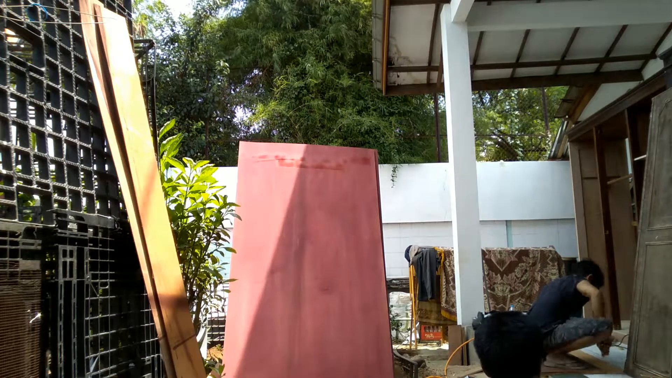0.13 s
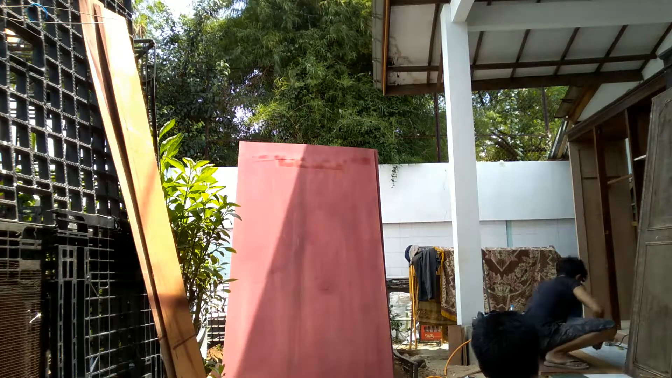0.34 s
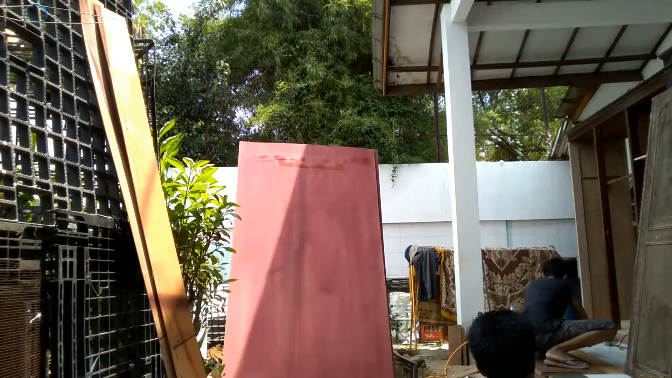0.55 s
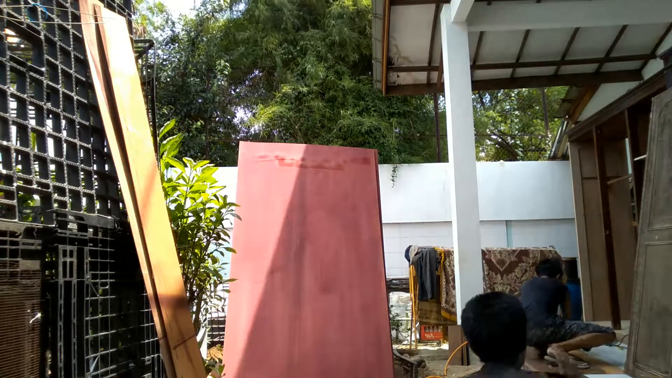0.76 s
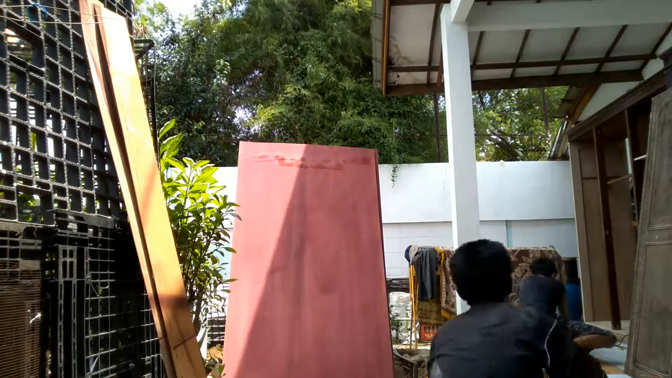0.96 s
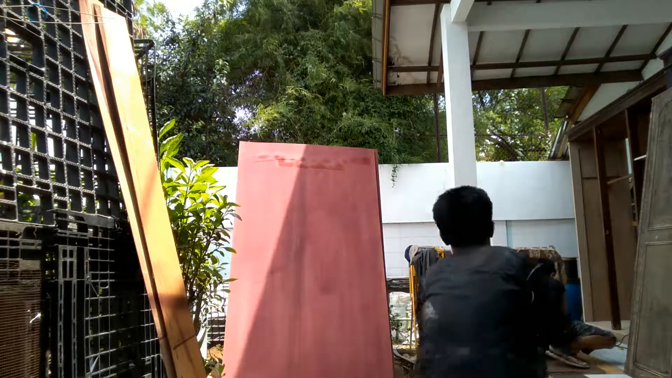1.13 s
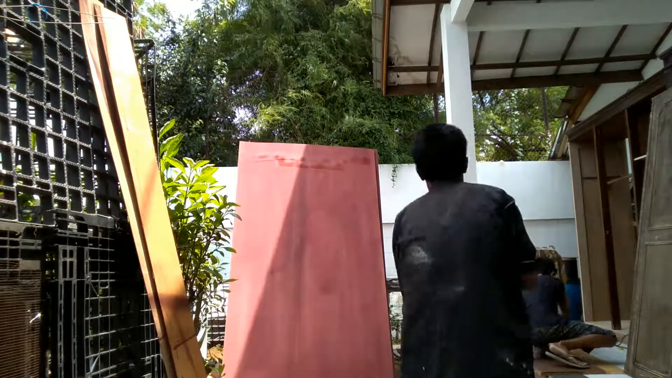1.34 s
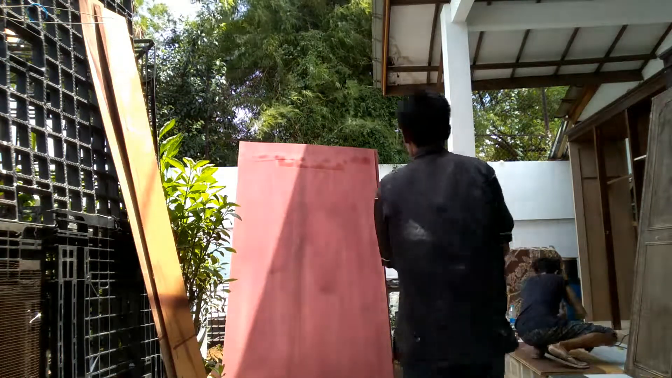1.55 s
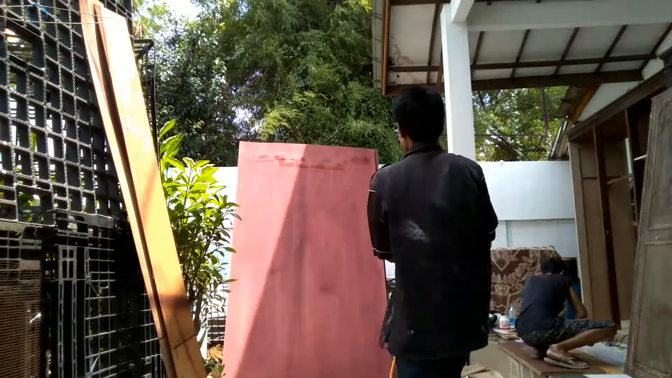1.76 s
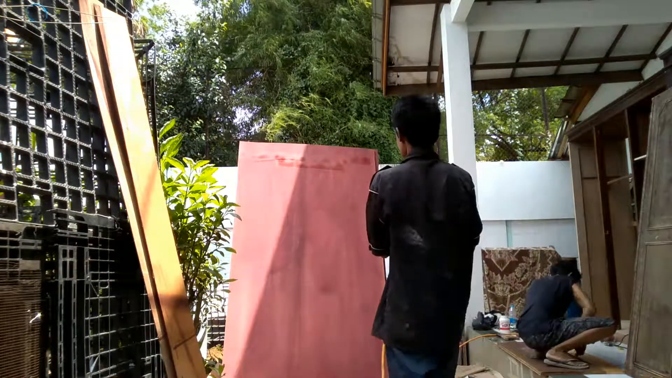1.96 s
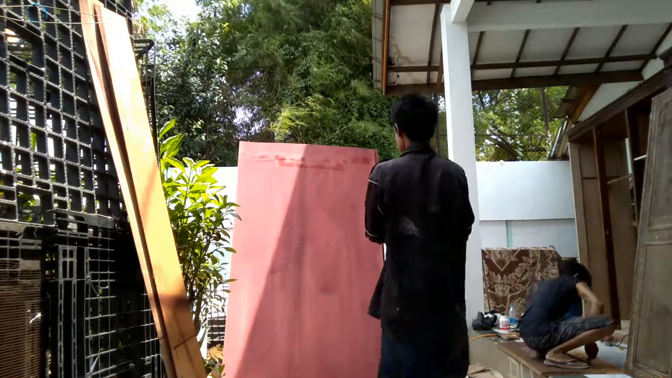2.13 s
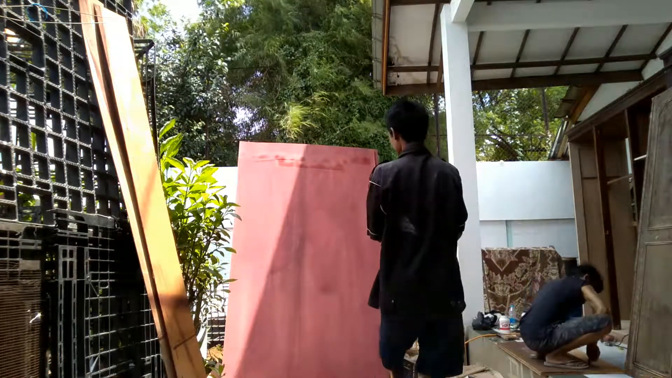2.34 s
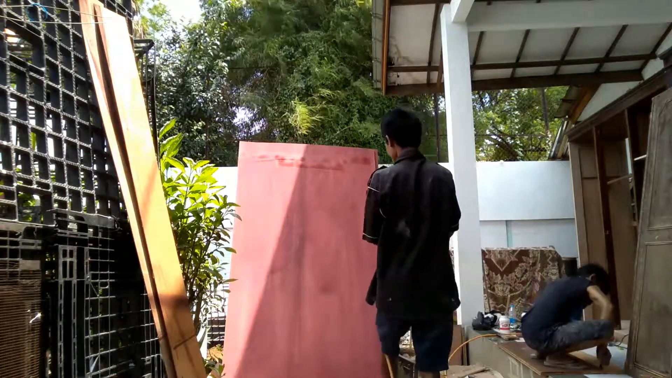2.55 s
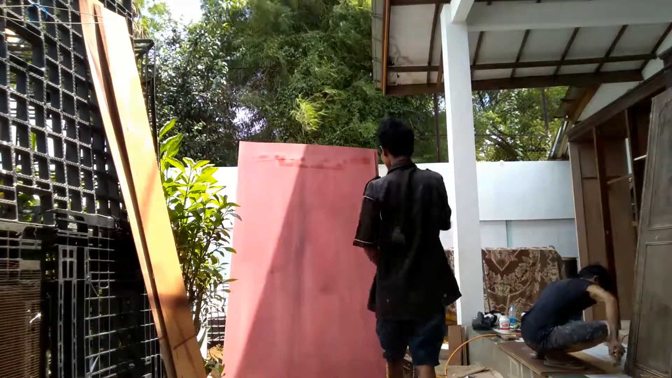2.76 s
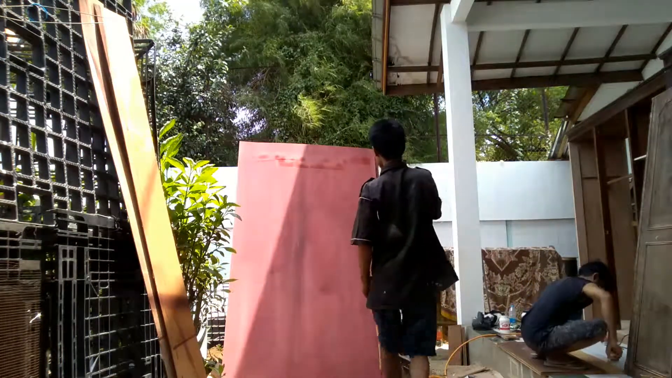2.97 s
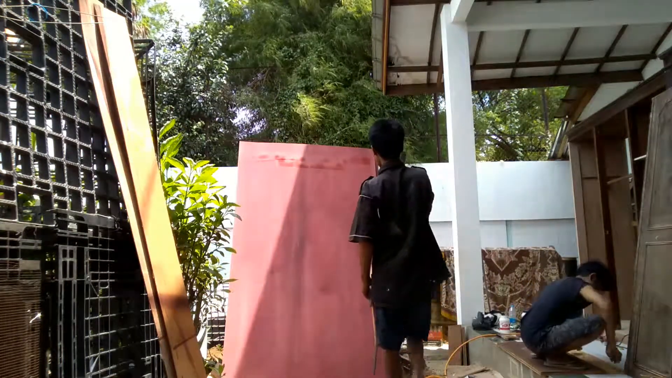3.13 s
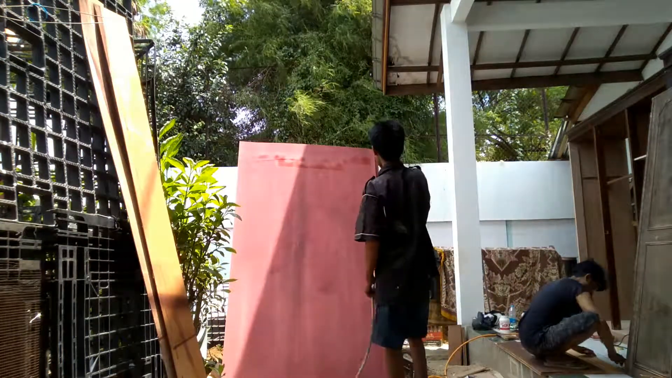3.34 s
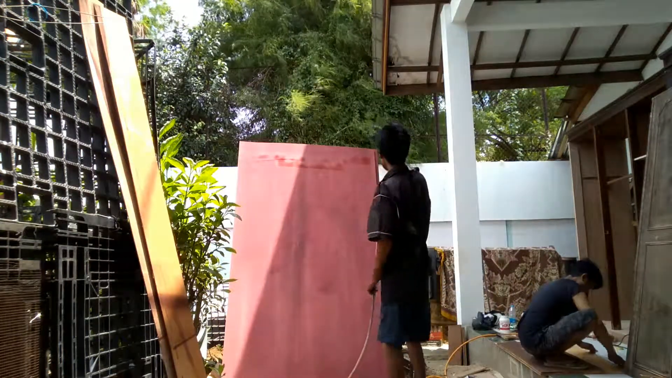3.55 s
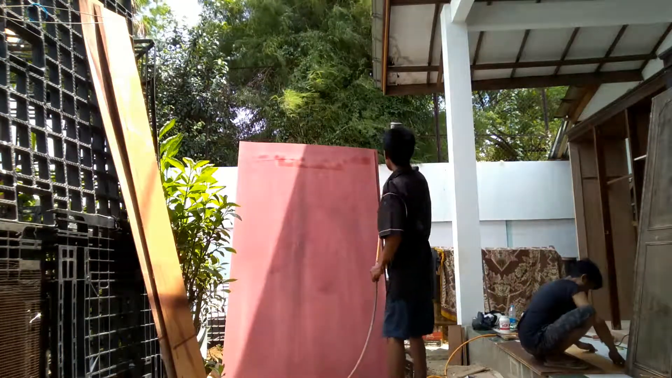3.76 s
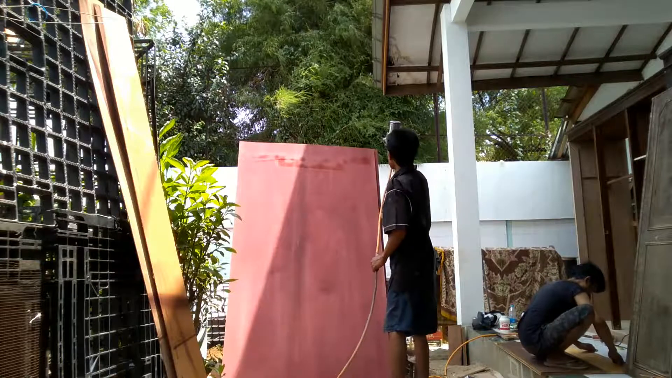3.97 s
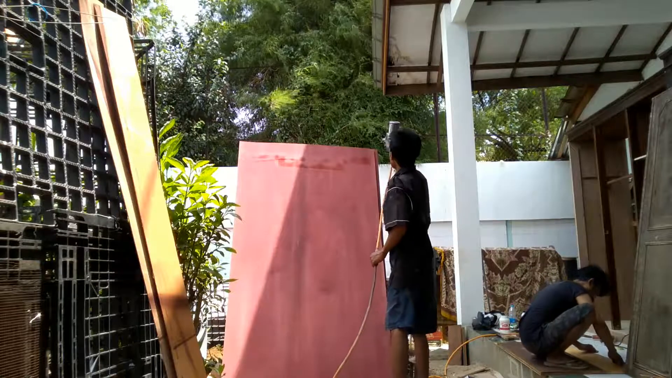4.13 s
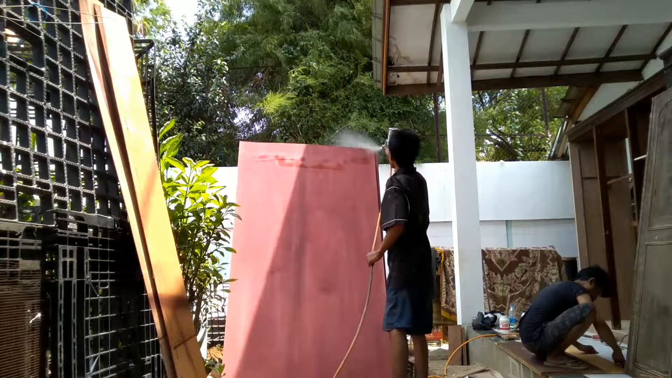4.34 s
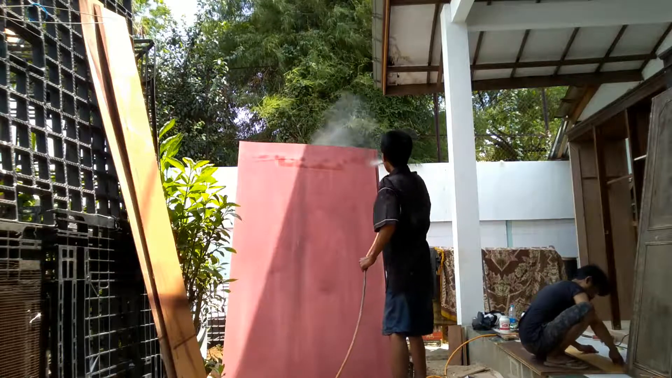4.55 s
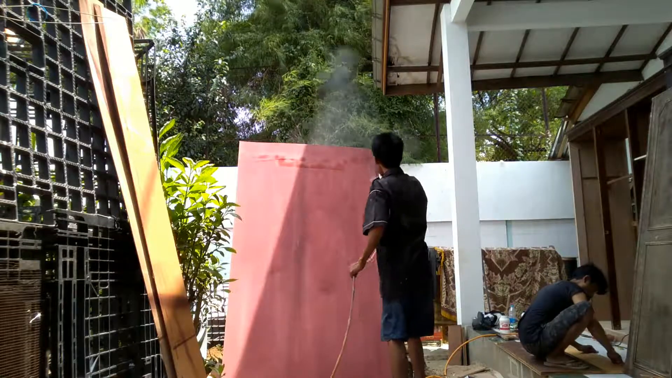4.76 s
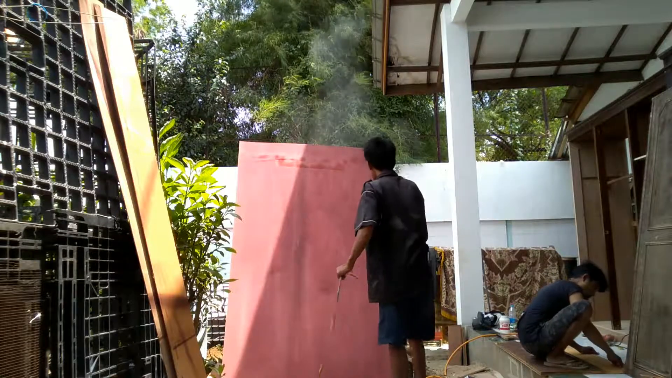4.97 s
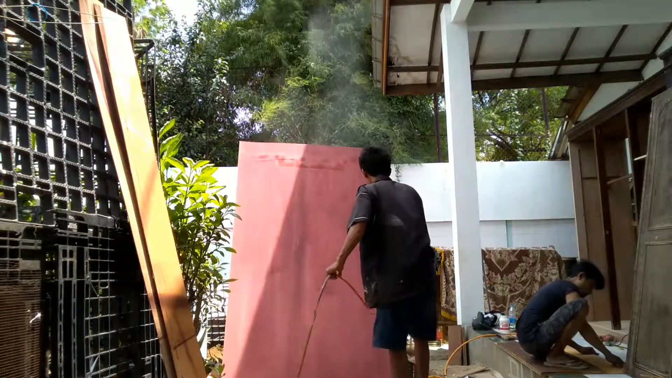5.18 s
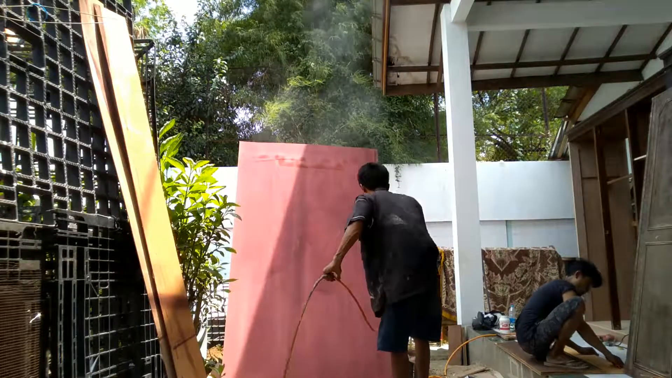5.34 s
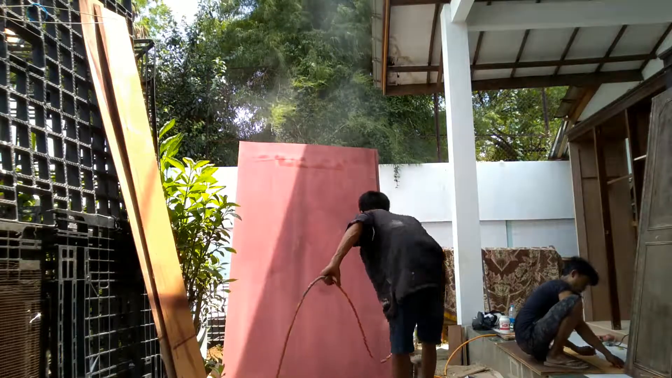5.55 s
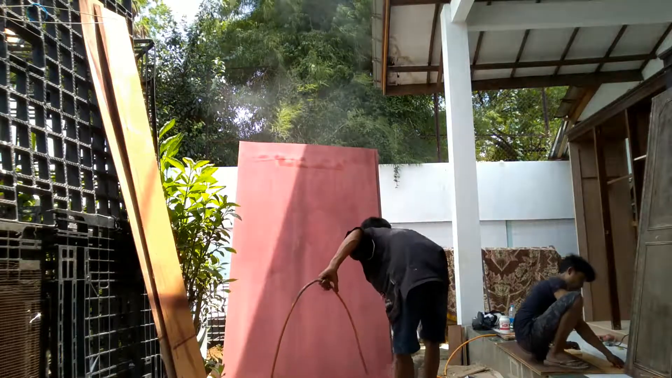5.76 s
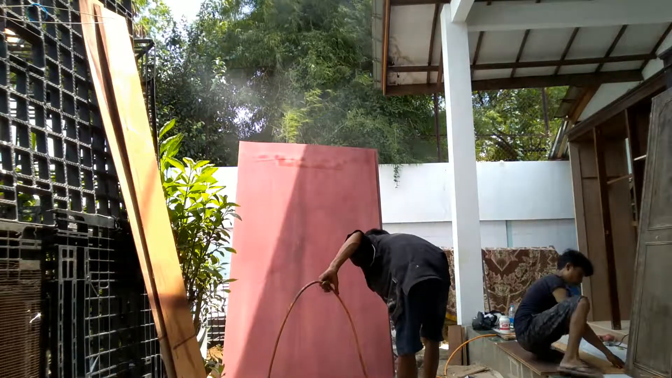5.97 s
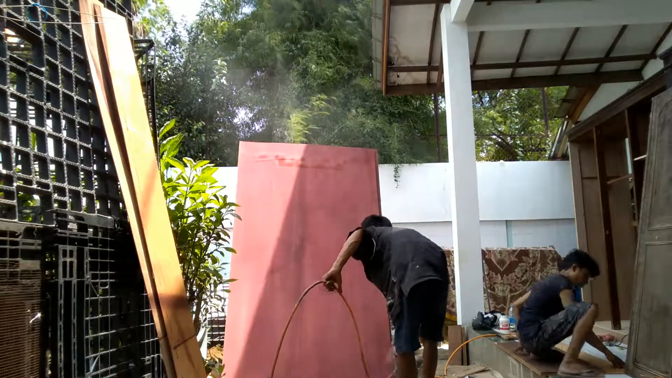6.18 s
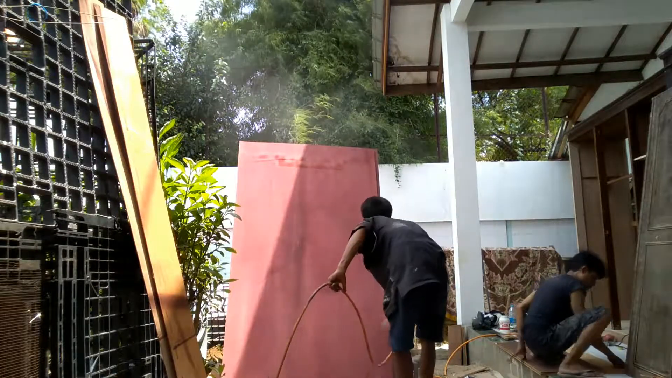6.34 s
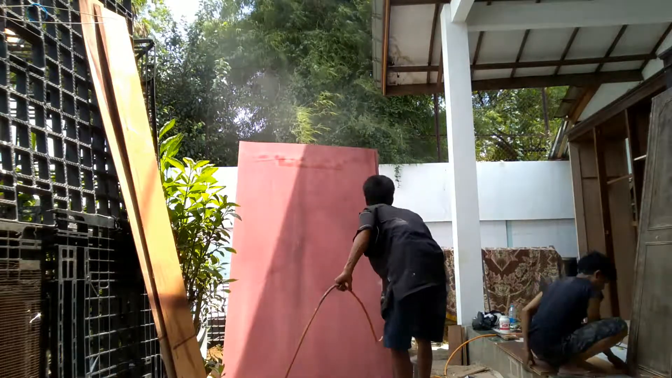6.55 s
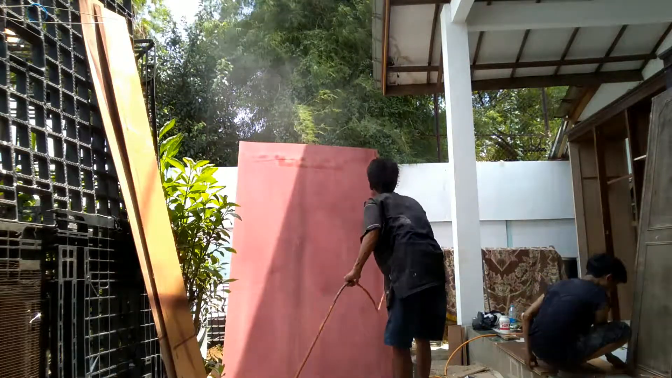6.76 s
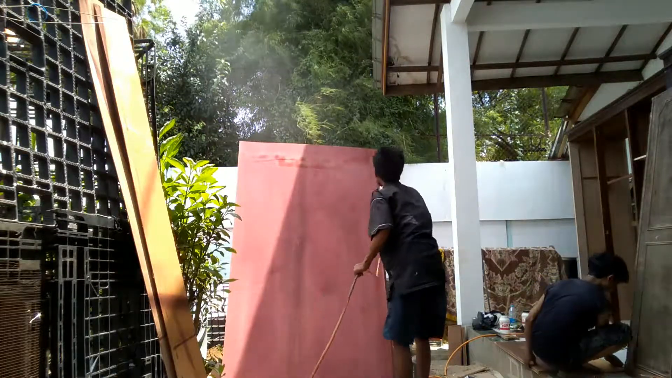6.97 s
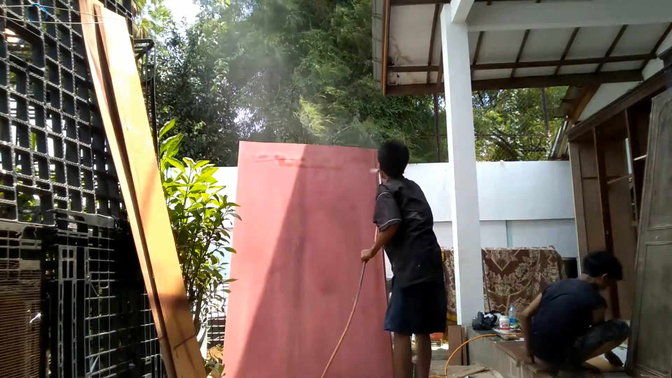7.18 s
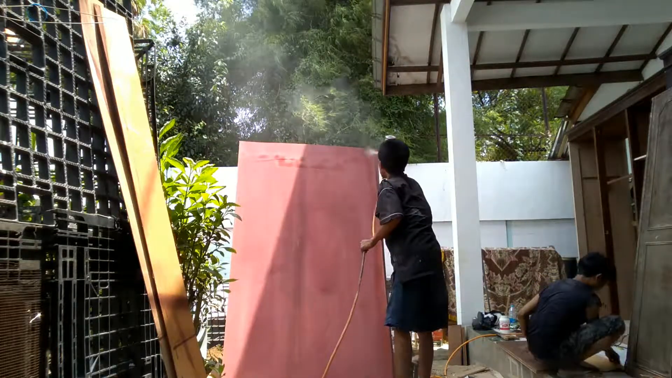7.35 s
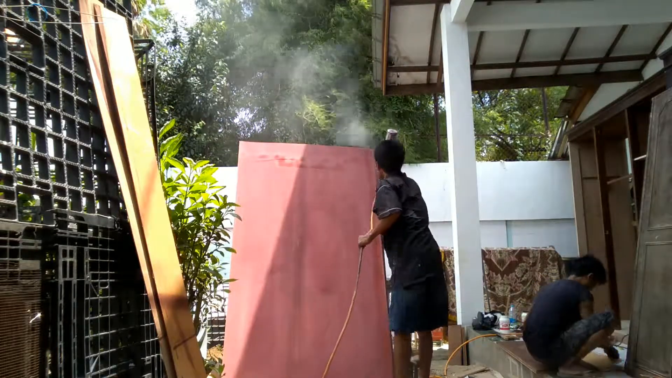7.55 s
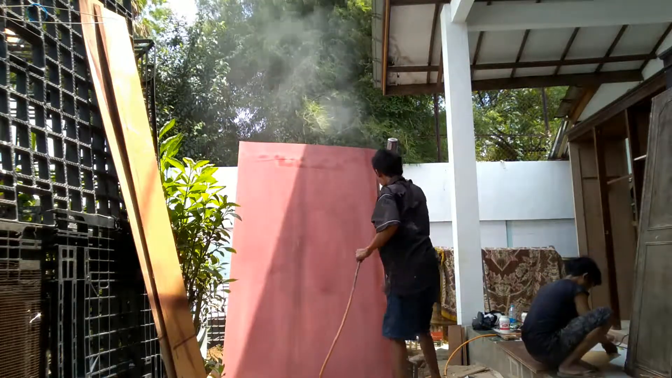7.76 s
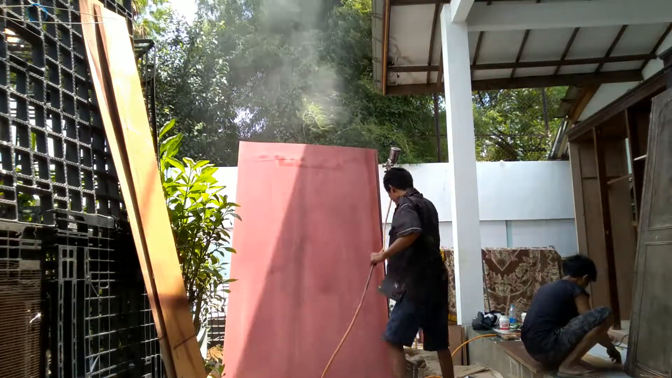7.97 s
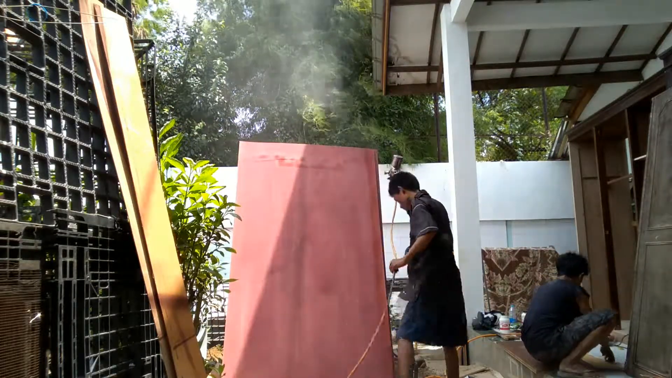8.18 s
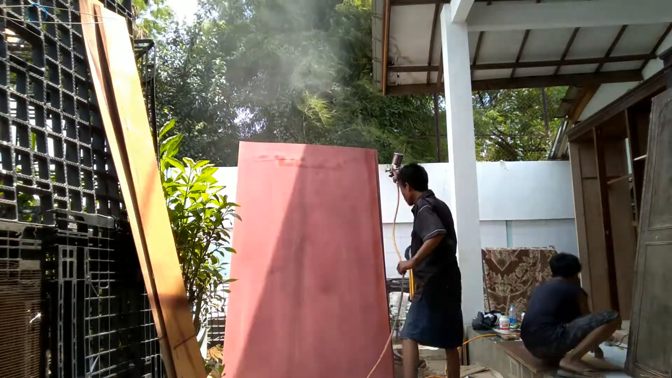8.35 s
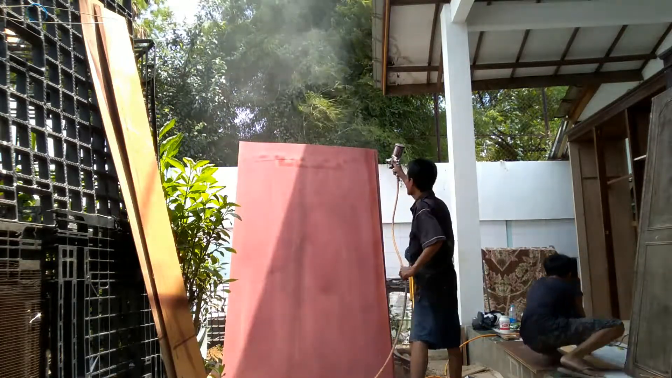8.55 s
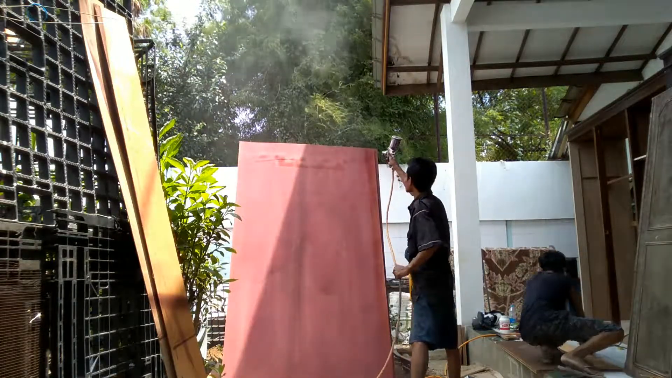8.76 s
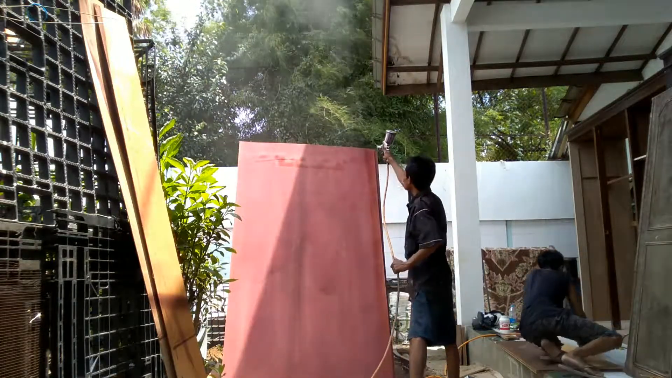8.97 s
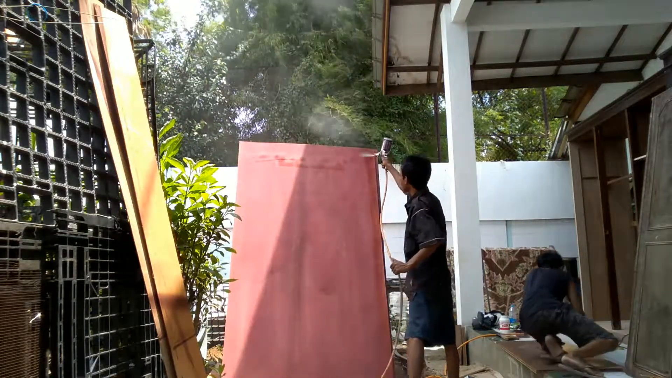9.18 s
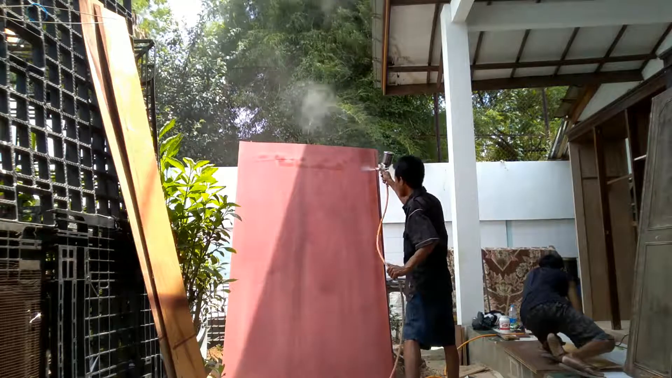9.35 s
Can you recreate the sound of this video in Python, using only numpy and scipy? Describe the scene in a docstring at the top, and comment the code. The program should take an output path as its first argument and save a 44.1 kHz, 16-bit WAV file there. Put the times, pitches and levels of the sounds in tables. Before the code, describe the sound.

An air compressor runs throughout behind a porch in an open yard: a steady low-mid hum with a fast piston clatter of about 24 turns a second, over soft machine rush, faint leak hiss and a light breeze. At 0.7 and 0.9 s two hard blows strike boards and a can, with short scattered outdoor echoes; after the second the can rocks, ringing in quick fading swells until 1.1 s. Bright, abrupt spray-gun puffs come at 2.0 and 2.55 s, then a shorter one at 3.9 s with a trigger click and light knock. From 4.2 s a soft board scuff opens a long, faint spray pass with a very high, thin whistle until 6.2 s; the hiss continues to 7.7 s. Light knocks fall at 6.1 and, hollower, 7.6 s. Low gusts buffet the microphone from about 7.8 s, with a faint scuff near 8.7 s, tiny puffs, and another whistling pass from 9.0 s to the end.

```python
"""A two-port microphone in an open yard: an air compressor behind a porch sums steady multiples of its turn,
under coloured noise for its rush, its leaks and a buffeting breeze. Blows ring boards and a can at 0.7 and 0.9
s, scatter a short tail off porch and walls, and the can's ring comes and goes in swells. Short spray-gun bursts
of banded noise follow from 2 s, with a third knock. From 4.2 s a long pass down a panel whistles very high,
with a scuffed board and two knocks; late gusts, another faint scuff and the start of a second pass end the
take."""
import sys
import numpy as np
from scipy import signal
from scipy.fft import rfft, irfft, next_fast_len
from scipy.io import wavfile
from scipy.ndimage import uniform_filter1d

SR = 44100
rng = np.random.default_rng(int(sys.argv[2]) if len(sys.argv) > 2 else 0)


def int16_out(signal):
    """Quantize to a 16-bit WAV file."""
    q = np.round(np.clip(np.atleast_2d(signal).T, -1, 1) * 32767)
    wavfile.write(sys.argv[1], SR, q.astype(np.int16))


N = 414981


def amp(db):
    """Turn dB into gain."""
    return 10 ** (np.asarray(db, float) / 20)


def rms_one(x):
    """Scale to unit rms."""
    return x / np.sqrt(np.mean(x ** 2) + 1e-20)


def whole(rows):
    """Draw a curve over the whole scene, held at its ends."""
    return np.interp(np.arange(N) / SR, *np.transpose(rows))


def at_hz(points, hz):
    """Read a spectrum on a log frequency axis."""
    points = np.array(points)
    return np.interp(np.log(hz), np.log(points[:, 0] + 1), points[:, 1])


def pan(db):
    """Left and right gains for a left-right difference in dB."""
    return amp(np.array([db / 2, -db / 2]))


def drift(rate_hz):
    """Slow random wander of rms 1: noise through two equal one-pole low-passes at rate_hz."""
    step = 40   # samples between the points of the wander
    r = np.exp(-2 * np.pi * rate_hz * step / SR)
    points = rng.standard_normal(N // step + 2002)
    slow = signal.lfilter([1], [1, -2 * r, r * r], points)[2000:]   # drop the filter's start
    return np.interp(np.arange(N) / step, np.arange(len(slow)), rms_one(slow))


def cut(x, hz, kind, order=4):
    """Butterworth low- or high-pass."""
    return signal.sosfilt(signal.butter(order, hz, kind, fs=SR, output="sos"), x)


def resonate(x, hz, width_hz):
    """A damped resonance: a unit click rings with a starting height of 1."""
    r, w = np.exp(-np.pi * width_hz / SR), 2 * np.pi * hz / SR
    return signal.lfilter([0, np.sin(w)], [1, -2 * r * np.cos(w), r * r], x)


def envelope(opens, rise, shuts, sag_db_per_s, release_db_per_s):
    """Level in dB: a quarter-sine opening, a sagging hold, a straight fall."""
    t = np.arange(N) / SR
    opening = np.clip((t - opens) / max(rise, .001), 1e-6, 1)
    climb = 20 * np.log10(np.sin(np.pi / 2 * opening))
    sag = sag_db_per_s * np.clip(t - opens - rise, 0, max(shuts - opens - rise, 0))
    fall = release_db_per_s * np.maximum(t - shuts, 0)
    return np.maximum(climb - sag - fall, -200)


# how alike the two microphone ports hear a sound: (f/Hz, likeness -1..1)
PORT_LIKENESS = [(60, 0.97), (180, 0.97), (550, 0.4), (1650, -0.18), (4970, 0.099), (15000, 0.0041)]


def coloured(spectrum, size=N):
    """Stereo noise of a given spectrum, alike in the bass and nearly unrelated in the treble; rms 1."""
    length = next_fast_len(size)
    hz = np.arange(length // 2 + 1) * SR / length + 1
    alike = np.clip(at_hz(PORT_LIKENESS, hz), -1, 1)
    mid, side = rfft(rng.standard_normal((2, length)))
    pair = np.sqrt(1 + alike) * mid + np.sqrt(1 - alike) * side * [[1], [-1]]
    return rms_one(irfft(pair * amp(at_hz(spectrum, hz)), length)[:, :size])


# crankshaft speed: (t/s, turns per s)
CRANK_SPEED = [(0, 23.73), (4.5, 23.73), (7.7, 23.805), (9.41, 23.795)]
# what pump and tank radiate on each multiple of the turn, from the first up: (relative level/dB)
PUMP_MULTIPLES = [-16.5, -7.5, -8, -13.5, -14.5, -12.5, -10.5, -12, -14, -23, -15, -10.5, 0.5, 0, -8, -25,
                  -45, -6.5, -11, -17.5, -17, -20, -18, -33, -14, -19.5, -15, -27.5, -9, -17, -20, -26.5,
                  -36, -30, -19, -26, -38, -24.5, -23.5, -30, -14, -18.5, -20]
# change of some multiples as spraying drains the tank: {multiple: change/dB}
TANK_DRAIN = {25: -2, 26: 5.5, 27: -6, 39: 6}
# moment of the turn at which each group of multiples peaks: (first multiple, turns)
STROKE_MOMENTS = [(1, .9), (11, .32), (13, 0), (14, .55), (16, .4), (18, .53), (20, .6)]
PUMP_DB, PUMP_WAVER_DB, UPPER_WAVER_DB = -53, 0.96, 1.6
DRAIN_S = 5.2   # middle of the one-second change
STROKE_START, STROKE_SCATTER = .82, .3   # turns


def compressor():
    """Every turn repeats the same clatter: steady multiples, each reaching the two ports a little apart."""
    turn = 2 * np.pi * np.cumsum(whole(CRANK_SPEED)) / SR
    out = np.zeros((2, N))
    wavers = [amp(PUMP_WAVER_DB * drift(4.4)) for _ in range(4)]
    wanders_db = [UPPER_WAVER_DB * drift(1.5) for _ in range(7)]
    drained = np.clip(np.arange(N) / SR - DRAIN_S + .5, 0, 1)
    tight_from, upper_from = STROKE_MOMENTS[1][0], STROKE_MOMENTS[-1][0]
    lag = 0
    for k, level_db in enumerate(PUMP_MULTIPLES):
        multiple = k + 1
        level_db = level_db + TANK_DRAIN.get(multiple, 0) * drained
        if multiple >= upper_from:   # the weak upper multiples also wander
            level_db = level_db + wanders_db[k % 7]
        alike = np.clip(at_hz(PORT_LIKENESS, multiple * CRANK_SPEED[0][1]), -1, 1)
        apart = np.arccos(alike) / -2   # the right port is nearer
        level = np.sqrt(2) * amp(PUMP_DB + level_db) * wavers[k % 4]
        wave = level * np.exp(1j * (multiple * turn - lag))
        out += [(wave * np.exp(1j * apart)).real, (wave * np.exp(-1j * apart)).real]
        # the phase step sets when neighbours swell together; the lowest and highest scatter
        moment = [turns for first, turns in STROKE_MOMENTS if first <= multiple][-1]
        scatters = not tight_from <= multiple < upper_from
        loose = STROKE_SCATTER * rng.standard_normal() * scatters
        lag += 2 * np.pi * (STROKE_START + moment + loose)
    return out


# colour of machine rush and air leaks: (f/Hz, level/dB per Hz, relative)
YARD_COLOUR = [(60, -66), (120, -12.5), (250, -15.5), (400, -21.5), (700, -27.5), (980, -20), (1300, -25),
               (2000, -33.5), (3600, -38.5), (4800, -35), (6300, -37), (8300, -34), (10800, -23),
               (15700, -27.5)]
# swell of the leak hiss: (t/s, level/dB)
LEAK_SWELL = [(0.6, -1), (1.2, -3), (1.7, -1), (2.4, -6), (3.4, -5.5)]
YARD_DB = -53.5


def yard():
    """Machine rush below, in two flickering bands; steady-grained leak hiss above, swelling slowly."""
    rush = amp(YARD_DB) * coloured(YARD_COLOUR)
    bands = cut(rush, 1700, "low"), cut(cut(rush, 1700, "high"), 6400, "low")
    low = sum(band * amp(2.15 * drift(13.6)) for band in bands)
    hiss = cut(rush, 7500, "high") * amp(whole(LEAK_SWELL))
    return low + hiss * pan(-2.8)[:, None]


# colour of wind on the ports: (f/Hz, level/dB per Hz, relative)
WIND_SPECTRUM = [(12, -27), (23, 1), (32, -4.5), (50, 3), (110, -8), (180, -11.5), (280, -39), (500, -66)]
# gusts on the ports: (t/s, level/dB, half length/s)
WIND_GUSTS = [(0.706, -42, 0.11), (1.798, -46.5, 0.12), (2.04, -43.5, 0.095), (2.646, -42.5, 0.12),
              (3.06, -47, .07), (3.42, -47, 0.13), (4.76, -47, 0.036), (5.704, -48.5, 0.36),
              (7.787, -45.5, 0.21), (8.032, -40.5, 0.056), (8.195, -40.5, 0.051), (8.348, -40, 0.033),
              (8.512, -45, 0.055), (8.64, -39, 0.036), (8.827, -38, 0.037), (9.0, -42.5, 0.05),
              (9.15, -39.5, 0.071), (9.34, -47, 0.069)]
# level of the wind above about 90 Hz: (t/s, level/dB)
WIND_EDGE_LEVEL = [(7.2, -12), (7.45, 4.5), (9.4, -3)]
BREEZE_DB, LUMPS_DB = -54.5, 2   # wind between gusts; how lumpy it is
WIND_PAN_DB = -2.5   # wind leans on the right port


def wind():
    """Lumpy low pressure on the microphone ports, swelling in gusts whose powers add to the breeze."""
    t = np.arange(N) / SR
    power = amp(2 * BREEZE_DB)
    for s, db, half in WIND_GUSTS:
        power = power + amp(2 * db) * np.exp(-2 * ((t - s) / half) ** 2)
    noise = coloured(WIND_SPECTRUM)
    deep = cut(noise, 90, "low", order=1)
    buffeting = deep + (noise - deep) * amp(whole(WIND_EDGE_LEVEL))
    return np.sqrt(power) * amp(LUMPS_DB * drift(24.4)) * buffeting * pan(WIND_PAN_DB)[:, None]


# what boards and can ring with, by part: thud, hollow, board, can, tap, clack;
# each part lists modes: (f/Hz, width/Hz, level/dB, level in the echoes/dB)
RING_MODES = [
    [(200, 160, 0, -18)],
    [(940, 130, -12, 9)],
    [(1050, 250, 0, -6), (1200, 90, -9, -2)],
    [(1502, 45, 0, -2), (1560, 45, -8, -2), (1420, 40, -9, 0)],
    [(1520, 260, 0, -4)],
    [(2200, 500, 0, 0), (3300, 1200, -3, -5)],
]
BOARD, CAN = 2, 3   # places in the list of parts
# colour of gun air, which the knock's crack borrows: (f/Hz, level/dB per Hz, relative)
JET_COLOUR = [(1300, -27.5), (2500, -18), (4000, -24), (6300, -19.5), (9000, -16), (10400, -8),
              (12000, -1.5), (15700, -9.5)]
# knocks: (t/s, left-right/dB, echoes level/dB, echoes hold/s, board pitch ratio, crack level/dB,
#          then level/dB of thud, hollow, board, can, tap, clack)
KNOCK_BLOWS = [(0.6614, -4.5, -7.5, 0.027, 0.95, -25.5, -3, -29, -6.5, -22.5, -4.5, -23),
               (0.9399, -1.5, -9.5, 0.048, 0.97, -25, -22, -33, -6.5, -14, -5, -8),
               (3.9374, 1, -3, 0.021, 1.06, -37, -60, -45, -13.5, -52, -20.5, -22.5),
               (6.119, -1, -13.5, 0.032, 1.11, -73, -65, -60, -28, -64, -14.5, -20.5),
               (7.638, -1, -8, 0.047, 1.21, -41, -43, -13.5, -20, -36, -12, -10)]
ECHO_T60_S, CLUMPS_DB = 0.23, 1.5   # echo decay after the hold; how unevenly the echoes arrive
PORT_LAG_S = 0.00013   # a blow reaches the left port later
CONTACT_S = .00008   # a blow lasts a moment, which dulls it


def knocks():
    """A blow and its scattered echoes set damped modes ringing; a bright noise crack shares the echo shape."""
    out, size = np.zeros((2, N)), SR // 2
    t = np.arange(size) / SR
    blow = np.arange(size) == [[round(PORT_LAG_S * SR)], [0]]
    contact = np.exp(-1 / (CONTACT_S * SR))
    for s, pan_db, echoes_db, hold, ratio, crack_db, *parts_db in KNOCK_BLOWS:
        fall = amp(-60 * np.maximum(t - hold, 0) / ECHO_T60_S) * np.minimum(t / .006, 1)
        clumps = amp(CLUMPS_DB * rms_one(uniform_filter1d(rng.standard_normal(size), size=SR // 250)))
        echoes = rng.standard_normal((2, size)) * amp(echoes_db) * fall * clumps
        echoes /= np.sqrt(SR / 100)   # echo level counts the energy in 10 ms
        rings, sign = 0, 1
        for part, (part_db, modes) in enumerate(zip(parts_db, RING_MODES)):
            for hz, width_hz, db, share_db in modes:
                pitch = hz * (ratio if part == BOARD else 1)
                struck = blow + amp(share_db) * echoes
                rings = rings + sign * amp(part_db + db) * resonate(struck, pitch, width_hz)
                sign = -sign   # successive modes start in opposite directions
        rings = signal.lfilter([(1 - contact) ** 2], [1, -2 * contact, contact ** 2], rings)
        rings *= np.minimum(t / .003, 1)   # the rings build up
        crack = amp(crack_db) * cut(coloured(JET_COLOUR, size=size), 8200, "low", order=2)
        crack *= (fall * clumps + 3.3 * np.exp(-t / 0.0017)) * np.minimum(t / 0.0013, 1)
        at = round(s * SR)
        out[:, at:at + size] += (rings + crack) * pan(pan_db)[:, None]
    return out


# the can's main ring comes in separate swells: (t/s, length/s, level/dB, left port lag/radians)
CAN_SWELLS = [(0.938, 0.029, -13, 1.65), (0.962, 0.032, -18, 1.2), (0.997, 0.039, -26.5, 1.4),
              (1.037, 0.021, -34, .6), (1.048, 0.037, -39, 2.8), (1.096, 0.027, -48, 2.3),
              (1.125, .022, -52, 2)]
SWELL_PAN_DB, SWELL_LEAN = -1, 0.82   # a lean under 1 makes a swell peak early
SWELL_FLUTTER_DB = 3.5   # the ring wavers differently at each port


def can():
    """Each swell of the can's main ring rises and then falls away."""
    t, out = np.arange(N) / SR, 0
    ring_hz = RING_MODES[CAN][0][0]
    for s, length, db, lag in CAN_SWELLS:
        progress = np.clip((t - s) / length, 0, 1)
        swell = np.abs(np.sin(np.pi * progress ** SWELL_LEAN)) * (t < s + length)
        phase = 2 * np.pi * ring_hz * t - lag / 2 * np.array([[1], [-1]])
        out = out + amp(db) * swell * np.sin(phase)
    flutter = amp(SWELL_FLUTTER_DB * np.array([drift(90.0), drift(90.0)]))
    return out * flutter * pan(SWELL_PAN_DB)[:, None]


# short bursts of gun air: (opens t/s, rise/s, shuts t/s, level/dB,
#                           extra below 9 kHz/dB, extra above 11.8 kHz/dB, left-right/dB)
GUN_PUFFS = [(1.955, 0.014, 2.11, -55, 8, 3, -2), (2.029, 0.052, 2.19, -28.5, -6.5, 0.5, -4),
             (2.503, 0.011, 2.7, -47, -9, -5, -8), (2.562, 0.079, 2.724, -27.5, -2.5, -6, -2.5),
             (3.772, 0.058, 3.9, -50.5, -3, 8.5, -6), (3.929, 0.012, 4.03, -26, -17.5, -0.5, -2.5),
             (4.229, 0.013, 4.42, -57, -41, 19.5, 8.5), (5.42, .04, 5.47, -54, -4, 2, 7),
             (7.69, 0.04, 7.82, -63.5, 21, -10, -2), (8.851, 0.0031, 8.862, -45.5, -9, 7, -7),
             (9.037, 0.012, 9.1, -39, -43, -8, 10)]
# long passes down the panel: (opens t/s, shuts t/s, spray level/dB, whistle level/dB, whistle stops t/s)
PANEL_PASSES = [(4.222, 7.746, -46.5, -47, 6.19), (9.035, 9.5, -47, -48.5, 9.5)]
# clicks of the trigger: (t/s, level/dB)
TRIGGER_CLICKS = [(2.034, -34), (2.508, -48), (2.562, -33.5), (3.9365, -17), (4.032, -33), (7.641, -36),
                  (8.853, -36)]
# colour of the nozzle whistle: (f/Hz, level/dB per Hz, relative)
WHISTLE_SPECTRUM = [(15250, -70), (15380, -16), (15480, 0), (15780, 0), (15900, -70)]
SAG_DB_PER_S, RELEASE_DB_PER_S = 17, 333   # pressure loss while a puff's valve is open, fall after it shuts
LOW_LAG_S, LOW_PATCHY_DB = 0.014, 3   # the lower jet band climbs and fades later, and sputters
PUFF_FLUTTER_DB = 1.5   # bursts sputter
PASS_RISE_S, PASS_LOW_DB, PASS_TOP_DB = 0.02, -7, 2
PASS_SWAY_DB = .5   # a held trigger gives an even jet
WHISTLE_SURGE_DB, WHISTLE_SETTLE_S = 6, 0.13   # the whistle starts louder
SPLASH_HZ, SPLASH_WIDTH_HZ, SPLASH_DB = 2020, 870, -23.5   # spray drumming on the panel, below the spray


def spray_gun():
    """Turbulent jet noise in three bands, panel splash, a narrow-band nozzle whistle and trigger clicks."""
    t = np.arange(N) / SR
    jet = coloured(JET_COLOUR)
    below, top = cut(jet, 11800, "low", order=8), cut(jet, 11800, "high", order=8)
    low, middle = cut(below, 9000, "low", order=8), cut(below, 9000, "high", order=8)
    # the low band sputters separately in its two halves
    lower = cut(low, 5000, "low") * amp(-9.0 + LOW_PATCHY_DB * drift(21.0))
    upper = cut(low, 4800, "high") * amp(LOW_PATCHY_DB * drift(18.0))
    low = lower + upper
    drumming = resonate(rng.standard_normal((2, N)), SPLASH_HZ, SPLASH_WIDTH_HZ)
    splash = rms_one(resonate(drumming, SPLASH_HZ, SPLASH_WIDTH_HZ))

    air = 0
    for opens, rise, shuts, db, low_db, top_db, pan_db in GUN_PUFFS:
        shape_db = envelope(opens, rise, shuts, SAG_DB_PER_S, RELEASE_DB_PER_S)
        late_db = envelope(opens, rise + LOW_LAG_S, shuts + LOW_LAG_S, 0, RELEASE_DB_PER_S)
        burst = low * amp(low_db + late_db) + amp(shape_db) * (middle + top * amp(top_db))
        air = air + amp(db) * burst * pan(pan_db)[:, None]
    air = air * amp(PUFF_FLUTTER_DB * drift(240.0))

    sway, whistle_level = amp(PASS_SWAY_DB * drift(6.1)), 0
    pass_spray = low * amp(PASS_LOW_DB) + middle + top * amp(PASS_TOP_DB) + splash * amp(SPLASH_DB)
    for opens, shuts, db, whistle_db, stops in PANEL_PASSES:
        flow = amp(db + envelope(opens, PASS_RISE_S, shuts, 0, RELEASE_DB_PER_S)) * sway
        air = air + flow * pass_spray
        surge_db = WHISTLE_SURGE_DB * np.exp(-np.maximum(t - opens, 0) / WHISTLE_SETTLE_S)
        shape_db = envelope(opens, PASS_RISE_S, stops, 0, RELEASE_DB_PER_S)
        whistle_level = whistle_level + amp(whistle_db + surge_db + shape_db)
    whistle = coloured(WHISTLE_SPECTRUM) * whistle_level * amp(1.8 * drift(30.0)) * pan(8.0)[:, None]

    clicks = np.zeros(N)
    for s, db in TRIGGER_CLICKS:
        clicks[round(s * SR)] = amp(db)
    snap = signal.lfilter([1], [1, -np.exp(-1 / (.002 * SR))], clicks + 1e-18)   # 2 ms decay
    return air + jet * snap + whistle


# something drags over a board: (t/s, rise/s, level/dB, f/Hz, width/Hz)
BOARD_SCUFFS = [(4.27, 0.051, -55.5, 2170, 540), (4.315, 0.027, -53, 1650, 770),
                (4.3, 0.034, -53, 710, 670), (8.665, .02, -65, 2320, 1300)]
SCUFF_FADE_DB_PER_S, SCUFF_PAN_DB = 142, 9.5


def scuff():
    """A soft rub: noise through broad resonances, each swelling and fading."""
    out = 0
    for s, rise, db, hz, width_hz in BOARD_SCUFFS:
        ring = resonate(resonate(rng.standard_normal((2, N)), hz, width_hz), hz, width_hz)
        out = out + rms_one(ring) * amp(db + envelope(s, rise, s + rise, 0, SCUFF_FADE_DB_PER_S))
    return out * pan(SCUFF_PAN_DB)[:, None]


def scene():
    """All sources summed at the two microphone ports."""
    return compressor() + yard() + wind() + knocks() + can() + spray_gun() + scuff()


CUTOFF_HZ = 15780


def record(dry):
    """A steep elliptic low-pass cuts the top."""
    return signal.sosfilt(signal.ellip(12, .5, 80, CUTOFF_HZ, fs=SR, output="sos"), dry)


dry = scene()
out = record(dry)
int16_out(out)
```